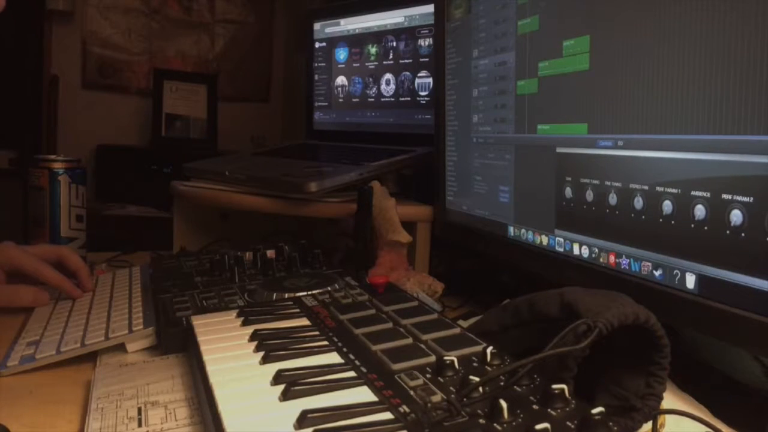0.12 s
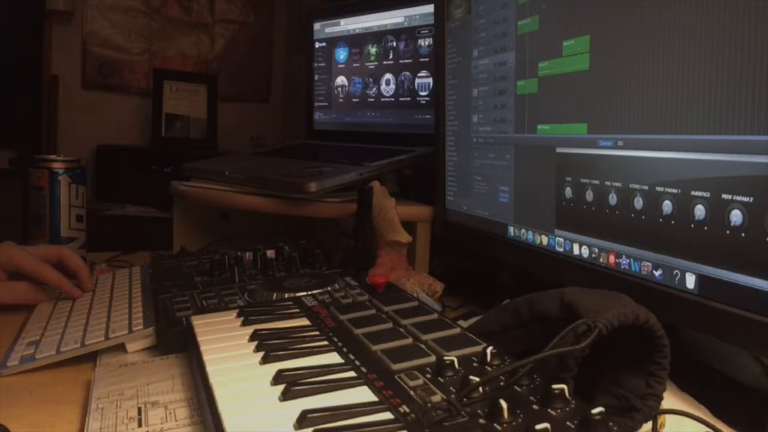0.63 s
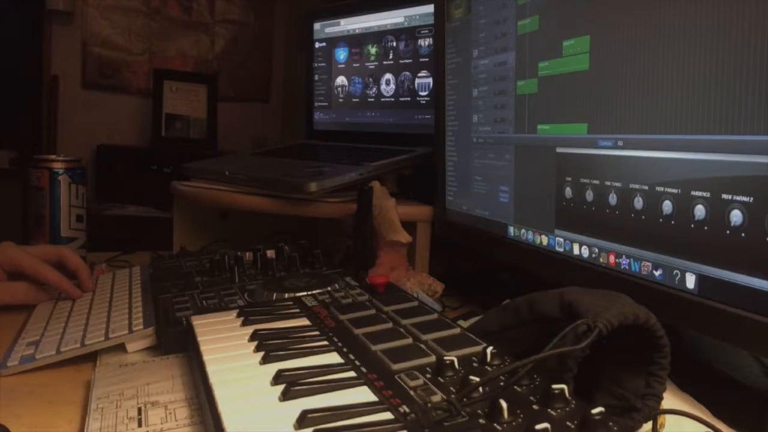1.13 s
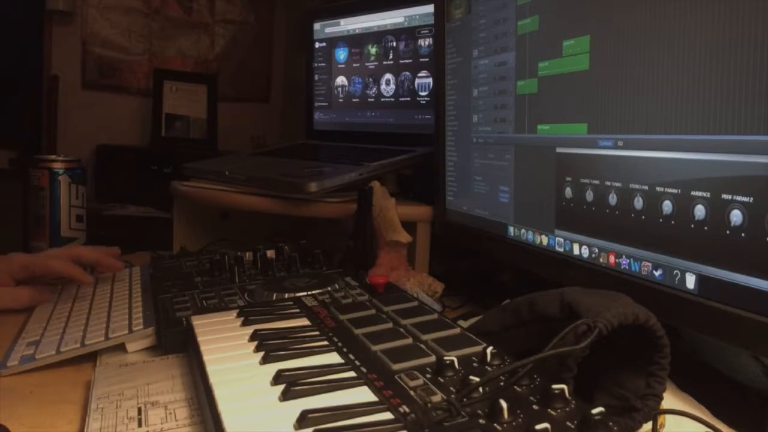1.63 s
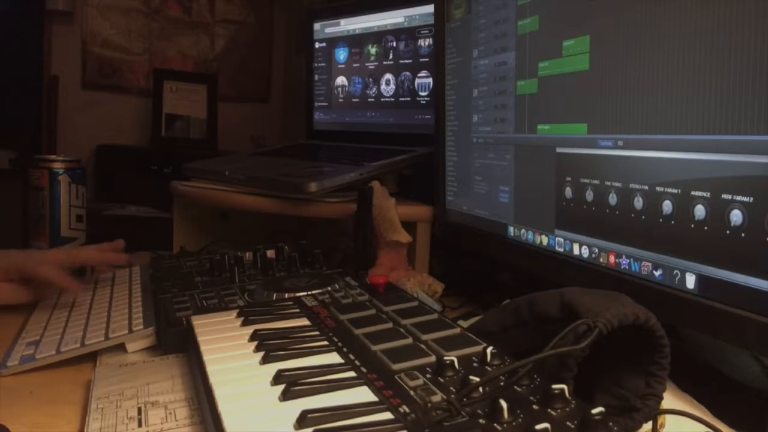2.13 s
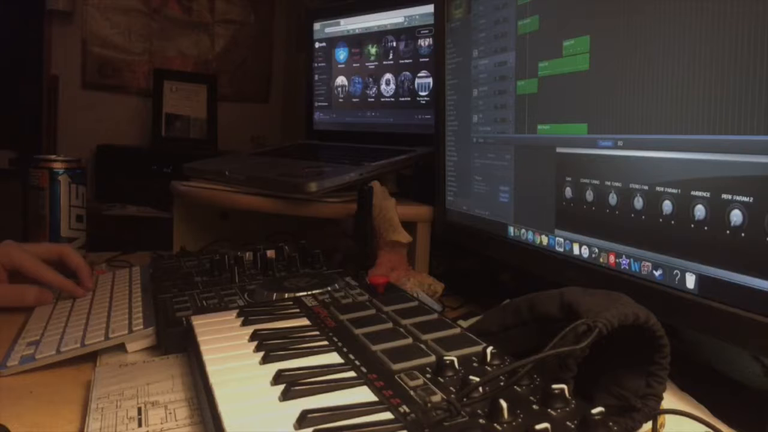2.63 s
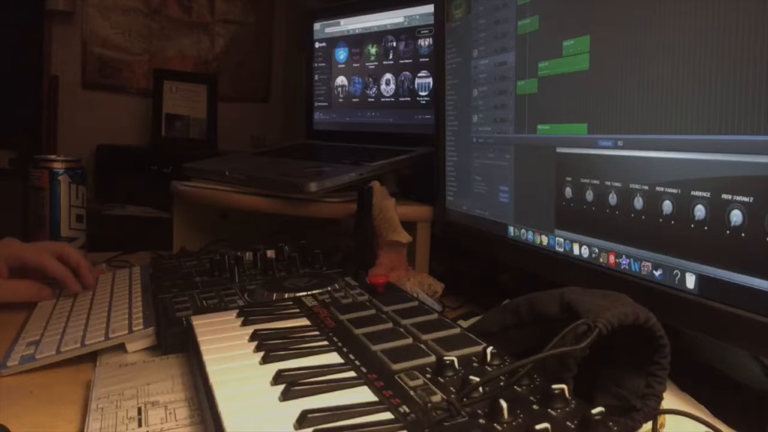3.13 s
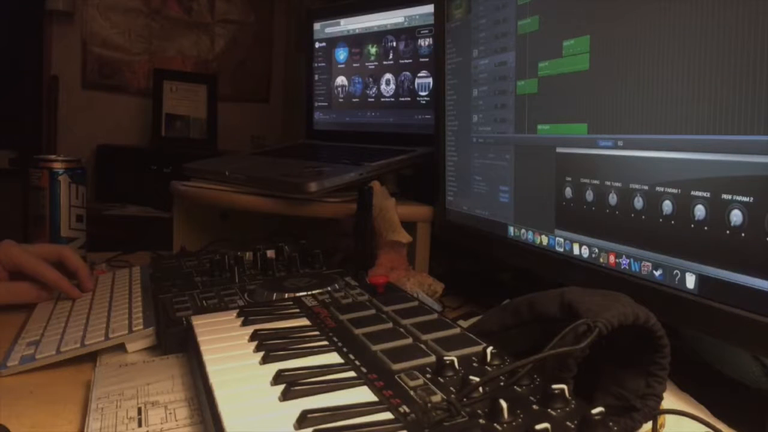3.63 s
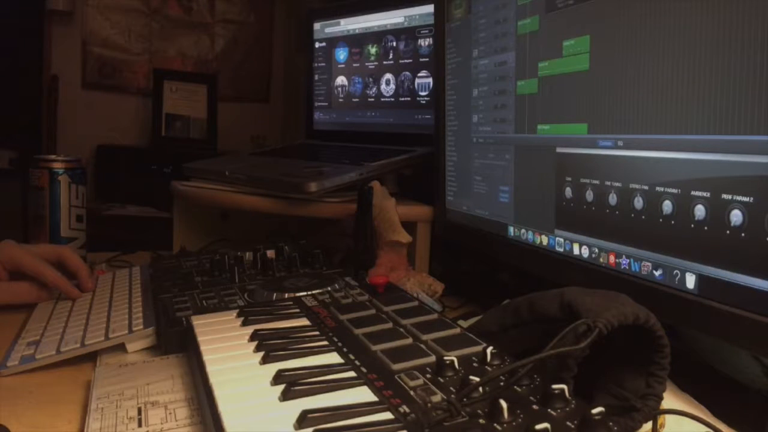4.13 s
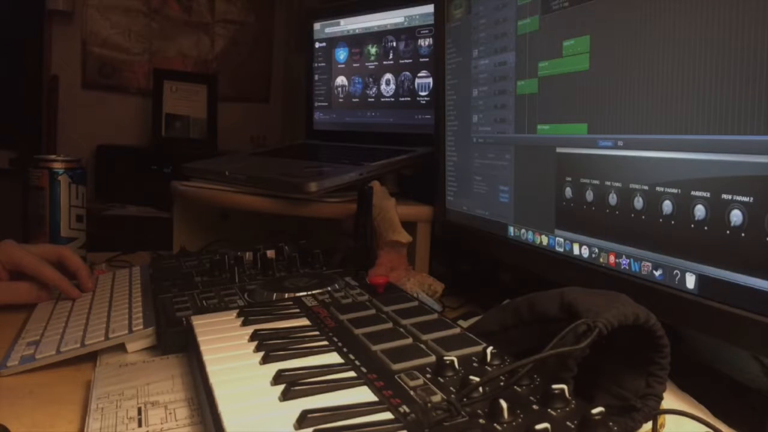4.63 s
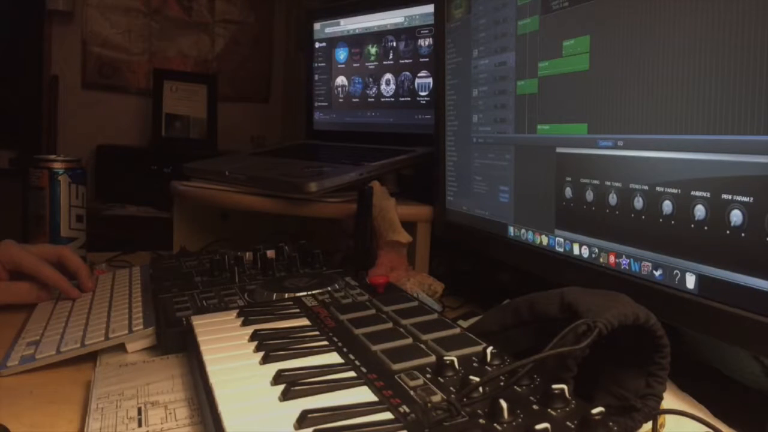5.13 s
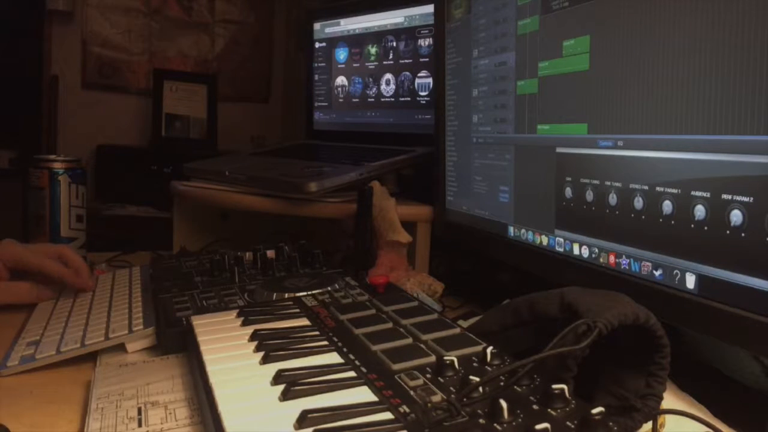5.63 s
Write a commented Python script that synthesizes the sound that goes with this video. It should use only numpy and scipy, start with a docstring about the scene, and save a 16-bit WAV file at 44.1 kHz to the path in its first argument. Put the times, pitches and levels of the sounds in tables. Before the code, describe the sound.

In a small furnished room, a constant low motor and mains hum lies under soft air hiss. A hand on a thin computer keyboard makes sparse, faint clicks: one early, a couple near one second, a crackly cluster around 1.6 seconds, then a long gap, another click just after three seconds and last ones near the end. Close, quiet mono pickup with little reverberation.

```python
"""A low steady hum fills a quiet home room: a motor turning, and the magnetic hum of its mains supply.
Air noise fills the low room modes and hisses above them; narrow bands and short swells are part of it.
A hand on a thin computer keyboard makes scattered faint clicks: rattles of tiny knocks ring the key parts.
Soft fingertip touches are dull puffs of noise, and fingers brushing the keys are dense grains."""
import sys
import numpy as np
from scipy import signal
from scipy.fft import rfft, irfft
from scipy.io import wavfile

SR = 44100
rng = np.random.default_rng(int(sys.argv[2]) if len(sys.argv) > 2 else 0)


def generate_wav(sig):
    """Save sig (samples, or channels by samples) to the path in sys.argv[1] as 16-bit PCM at SR."""
    pcm = np.round(np.clip(np.atleast_2d(sig).T, -1, 1) * 32767).astype(np.int16)
    wavfile.write(sys.argv[1], SR, pcm)


def convert_level_to_amplitude(level_db):
    """Map a level in decibels to its linear amplitude factor."""
    exponent = np.asarray(level_db, float) / 20
    return 10 ** exponent


N = 254016  # samples, 5.76 s


def rms_one(x):
    """Scale to rms 1."""
    return x / np.sqrt(np.mean(x ** 2) + 1e-20)


def drift(rate_hz):
    """Slow random curve of mean 0 and spread about 1: noise through two equal one-pole low-passes."""
    hop = 40  # samples between the points of the curve
    pole = np.exp(-2 * np.pi * rate_hz * hop / SR)
    noise = rng.standard_normal(N // hop + 4002)
    slow = signal.lfilter([1], [1, -2 * pole, pole * pole], noise)[4000:]
    return np.interp(np.arange(N) / hop, np.arange(len(slow)), rms_one(slow - slow.mean()))


def resonance(x, hz, width_hz):
    """One two-pole resonance with a gain of about 1 at its peak."""
    r = np.exp(-np.pi * width_hz / SR)
    feed = np.array([1, 0, -1]) * (1 - r * r) / 2
    return signal.lfilter(feed, [1, -2 * r * np.cos(2 * np.pi * hz / SR), r * r], x)


def resonance_twice(x, hz, width_hz):
    """Two equal resonances in a row: the skirts fall steeper, so the valleys stay dark."""
    return resonance(resonance(x, hz, width_hz), hz, width_hz)


def tone(hz, level_db, waver_db):
    """A sine of steady pitch whose level wavers a little."""
    phase = 2 * np.pi * (hz * np.arange(N) / SR + rng.random())
    return np.sqrt(2) * convert_level_to_amplitude(level_db + waver_db * drift(1.5)) * np.sin(phase)


def hum():
    """Multiples of the motor's rotation, magnetic hum at twice the mains rate, and their sum tones."""
    motor_hz, magnet_hz = 57.72, 119.92
    # motor turning: rotation_multiple, level_db (rms)
    motor_orders = [(1, -44), (2, -82), (3, -71), (4, -68), (5, -74.5), (12, -91.5), (13, -81)]
    # magnetic hum and its sums with the rotation: hum_multiple, rotation_multiple, level_db (rms)
    magnet_tones = [(1, 0, -44.5), (1, 1, -67), (1, 2, -79), (2, 0, -79.5), (2, 1, -73)]
    turning = sum(tone(k * motor_hz, db, waver_db=0.5) for k, db in motor_orders)
    magnetic = sum(tone(m * magnet_hz + k * motor_hz, db, waver_db=0.46) for m, k, db in magnet_tones)
    return turning + magnetic


def rumble():
    """Air noise heard through each low room mode, every mode wavering on its own."""
    waver_db = 2.5
    # low room modes: pitch_hz, width_hz (of both passes together), level_db (rms before the waver)
    room_modes = [(41.5, 8, -70.5), (62.3, 15, -61.5), (90, 21, -60.5), (120.8, 10.6, -55),
                  (136.7, 22.5, -54), (170.5, 18, -62), (212, 19.5, -63.5), (231, 5.8, -67.5),
                  (260.9, 14.7, -66), (290.8, 33, -66), (350, 54, -70), (403.5, 14.6, -75),
                  (485.3, 18, -81.5)]
    out = np.zeros(N)
    for hz, width_hz, db in room_modes:
        filled = resonance_twice(rng.standard_normal(N + SR), hz, width_hz * 1.5)
        settled = filled[SR:]  # the first second lets the filter fill up
        out += convert_level_to_amplitude(db + waver_db * drift(12.0)) * rms_one(settled)
    return out


def air():
    """Coloured air noise: bands come and go in the middle range, the top is a nearly steady hiss."""
    hiss_db = -68.5  # rms of the whole
    # colour of the hiss: pitch_hz, density_db (relative, per Hz)
    hiss_colour = [(450, -0.5), (600, -2.5), (750, -2.5), (1000, -4), (1400, -3), (1800, -4), (2050, -6.5),
                   (2320, -10), (3000, -14), (3800, -15), (4800, -18), (8000, -22), (13000, -25),
                   (15000, -28.5), (16000, -36)]
    hz = np.fft.rfftfreq(N, 1 / SR) + 1
    points = np.array(hiss_colour)
    colour = convert_level_to_amplitude(np.interp(np.log(hz), np.log(points[:, 0]), points[:, 1]))
    low_cut = 1 / (1 + (400 / hz) ** 4)
    spectrum = rfft(rng.standard_normal(N)) * colour * low_cut
    step = 10 * np.log2(np.clip(hz, 500, 4000) / 500)  # tenths of an octave
    together, out = drift(15.0), np.zeros(N)
    for centre in range(31):
        share = np.clip(1 - abs(step - centre), 0, 1)  # neighbouring shares add to one
        unrest = np.clip((30 - centre) / 10, .1, 1)  # calms down above 2 kHz
        waver_db = unrest * (.6 * together + 2.3 * drift(7.0))
        out += irfft(spectrum * share, N) * convert_level_to_amplitude(waver_db)
    return convert_level_to_amplitude(hiss_db) * rms_one(out)


def air_bands():
    """Narrow bands of noise that stand out of the air noise, each swelling and fading on its own."""
    waver_db = 3.0
    # bands: pitch_hz, width_hz (of each of two passes), level_db (rms before the waver)
    narrow_bands = [(900, 80, -85), (1090, 80, -85), (1389, 100, -85), (1564, 50, -87), (1768, 60, -86),
                    (1905, 25, -89), (2131, 120, -88), (2778, 130, -91), (3058, 110, -93)]
    out = np.zeros(N)
    for hz, width_hz, db in narrow_bands:
        band = resonance_twice(rng.standard_normal(N), hz, width_hz)
        out += convert_level_to_amplitude(db + waver_db * drift(6.0)) * rms_one(band)
    return out


def noise_swells():
    """Short narrow-band swells of noise at random moments and pitches, part of the noise floor."""
    swells_per_s, swells_db = 110, -77  # over all pitches; rms of the whole
    tilt_db, width_share = -9, .016  # from lowest to highest pitch; width of each pass over pitch
    hop = 40  # samples between possible starts
    pitches_hz, out = np.geomspace(700, 3200, 48), np.zeros(N)
    swell = np.hanning(SR // 25)[::hop]  # 40 ms
    for k, hz in enumerate(pitches_hz):
        steps = N // hop + 1
        starts = rng.random(steps) < hop * swells_per_s / len(pitches_hz) / SR
        strength = convert_level_to_amplitude(3 * rng.exponential(1, steps).clip(0, 2.5))
        envelope = np.convolve(starts * strength, swell)[:steps]
        swelling = np.repeat(envelope, hop)[:N] * rng.standard_normal(N)
        width_hz = width_share * hz
        band = resonance_twice(swelling + 1e-18, hz, width_hz) / np.sqrt(width_hz)
        out += convert_level_to_amplitude(tilt_db * k / len(pitches_hz)) * band
    return convert_level_to_amplitude(swells_db) * rms_one(out)


def brush():
    """Skin on plastic: dense grains through a broad resonance; each stroke swells and fades."""
    edge_db = -11  # one rise before and one fall after the loudest moment
    # strokes: loudest_s, rise_s, fall_s, level_db (rms at the loudest moment), centre_hz
    strokes = [(.52, 0.14, 0.072, -76.5, 5400), (1.24, .04, .03, -83, 9000),
               (1.588, 0.018, 0.011, -71, 11000), (1.63, 0.059, 0.043, -78, 3670),
               (1.695, 0.023, 0.053, -73, 6840), (.93, .012, 0.062, -77, 6200),
               (3.158, 0.014, 0.056, -72.5, 5850), (3.34, .04, 0.071, -76, 4800),
               (5.355, 0.013, .01, -79, 4970), (5.375, 0.03, .05, -76.5, 5000),
               (5.74, 0.031, 0.012, -70, 10000)]
    out, t = np.zeros(N), np.arange(N) / SR
    present = rng.random(N) < 15000 / SR  # grains per second
    grains = convert_level_to_amplitude(3.0 * rng.exponential(1, N)) * rng.choice([-1, 1], N) * present
    bright = signal.sosfilt(signal.butter(2, 2500, "high", fs=SR, output="sos"), grains)
    for loudest_s, rise_s, fall_s, db, hz in strokes:
        rub = rms_one(resonance(bright, hz, 0.42 * hz) + 0.23 * bright)
        away = np.maximum((loudest_s - t) / rise_s, (t - loudest_s) / fall_s)
        out += convert_level_to_amplitude(db + edge_db * np.minimum(away, 6) ** 2.0) * rub
    return out


def thumps():
    """Soft fingertip touches: a puff of noise through one dull resonance."""
    # touches: start_s, level_db (peak), pitch_hz, rise_s (until the puff is loudest)
    touches = [(0.44, -58.5, 1010, 0.011), (0.501, -56, 1320, 0.016), (0.655, -64, 1350, 0.007),
               (1.619, -55, 950, 0.006), (1.64, -58, 420, .01), (1.684, -57, 900, 0.005),
               (3.176, -60, 1410, 0.008), (2.755, -63.5, 2830, 0.013), (3.339, -57.5, 1480, 0.016),
               (3.532, -63, 1410, 0.0066), (4.24, -59, 1340, 0.0061)]
    out, span = np.zeros(N + SR), 4400
    t = np.arange(span) / SR
    for start_s, db, hz, rise_s in touches:
        puff = rng.standard_normal(span) * t / rise_s * np.exp(1 - t / rise_s)
        rung = resonance_twice(puff, hz, 350)
        at = round(start_s * SR)
        out[at:at + span] += convert_level_to_amplitude(db) * rung / abs(rung).max()
    return out[:N]


def key_knocks(t):
    """A rattle of tiny knocks, a few ms long, with a faint tail, scattered early reflections from the desk."""
    scatter_db, scatter_s = -22, .004
    rattle = np.exp(-((t - .0005) / 0.0012) ** 2)
    scatter = convert_level_to_amplitude(scatter_db) * np.exp(-t / scatter_s)
    sparse = rng.standard_normal(len(t)) * (rng.random(len(t)) < .25)
    knocks = sparse * (rattle + scatter)
    knocks[0] = 2.2  # the first contact
    return knocks


def keys():
    """The knocks of each contact strike the modes of every part; a broad snap fills the gaps."""
    favour_db_per_octave, snap_db = 62, -11
    case_lag_s = 0.00078  # the case answers a moment after the cap
    # contacts: start_s, plate_hz and cap_hz (pitches favoured there), then the peak of each ringing
    # part before its snap: case_db, plate_db, cap_db, hinge_db, stem_db, tick_db, edge_db
    contacts = [(0.3344, 3060, 4770, -64, -49.5, -42, -54, -51, -46.5, -49),
                (0.338, 2680, 4700, -50.5, -48, -65, -55, -58, -65, -66),
                (0.9155, 3250, 4650, -80, -53, -52.5, -50, -53, -62, -51),
                (0.92, 3200, 4400, -84, -68, -64, -60, -66, -75, -66),
                (0.958, 3200, 5200, -84, -67, -64, -62, -65, -74, -66),
                (1.157, 3200, 4700, -77, -74, -77, -69, -58, -57.5, -62),
                (1.578, 3200, 5200, -71, -61, -70, -64, -60, -69, -65),
                (1.584, 2750, 4400, -69, -62, -63, -66, -61, -70, -62),
                (1.591, 3200, 4400, -75, -72, -70, -70, -70, -75, -70),
                (1.615, 3200, 5200, -64, -64, -72, -69, -76, -80, -78),
                (1.6803, 2400, 3830, -76, -69, -66, -75, -54.5, -66, -58),
                (1.684, 2400, 3830, -80, -65, -56, -74, -62, -74, -68),
                (1.717, 3200, 4900, -70, -80, -69, -71, -62, -84, -78),
                (1.7328, 3200, 4700, -78, -80, -80, -74, -67, -76, -72),
                (3.1646, 2730, 4360, -62, -54.5, -51.5, -55, -52.5, -64, -56),
                (3.1692, 2660, 4900, -53.5, -52.5, -64, -66, -60, -66, -57),
                (3.767, 3200, 4700, -80, -64, -71, -69, -72, -81, -76),
                (5.3604, 3200, 4900, -80, -52, -45, -54, -57, -56, -52),
                (5.712, 3200, 4700, -61, -80, -80, -72, -60, -72, -64),
                (5.7295, 3200, 5200, -75, -80, -76, -59.5, -52.5, -61, -51),
                (5.735, 3200, 5200, -77, -80, -76, -64, -66, -68, -64)]
    # modes of key and case before small chances: pitch_hz, level_db (relative peak),
    # ring_s (nominal; each pass is 5.2 / ring_s Hz wide)
    ring_modes = [(1385, 0, 0.027), (2400, -3, 0.014), (2740, 0, 0.017), (3160, 0, 0.015),
                  (3850, -4, 0.012), (4350, -1, 0.014), (4690, 0, 0.015), (5200, -1, 0.012),
                  (5800, 0, 0.012), (6450, -2, 0.012), (7200, 0, 0.011), (8000, -6, 0.01),
                  (8750, -1, 0.011), (9400, 0, 0.011), (9850, -4, 0.01), (11250, -1, 0.009),
                  (12200, 0, 0.008), (13300, -6, 0.008), (14400, 0, 0.007), (15100, -6, 0.007)]
    # upper limit of each part's range but the last: top_hz
    part_tops_hz = [2000, 3700, 5550, 6850, 9050, 10500]
    out, span = np.zeros(N + SR), 2600
    t = np.arange(span) / SR
    edges_hz = [1100, *part_tops_hz, 15500]
    for start_s, plate_hz, cap_hz, *parts_db in contacts:
        knocks = key_knocks(t)
        parts = np.zeros((len(parts_db), span))
        for k, (hz, db, ring_s) in enumerate(ring_modes):
            level_chance, pitch_chance = rng.standard_normal(2)
            part = np.searchsorted(part_tops_hz, hz)
            if part in (1, 2):  # plate and cap
                favoured_hz = (plate_hz, cap_hz)[part - 1]
                db = db - favour_db_per_octave * abs(np.log2(hz / favoured_hz))
            rung = resonance_twice(knocks, hz * (1 + .007 * pitch_chance), 5.2 / ring_s)
            sign = (-1) ** k
            parts[part] += sign * convert_level_to_amplitude(db + 1.3 * level_chance) * rung / abs(rung).max()
        parts[0] = np.roll(parts[0], round(case_lag_s * SR))
        parts = parts / abs(parts).max(axis=1, keepdims=True)
        for part, band_hz in enumerate(zip(edges_hz, edges_hz[1:])):
            snap = signal.sosfilt(signal.butter(2, band_hz, "band", fs=SR, output="sos"), knocks)
            parts[part] += convert_level_to_amplitude(snap_db) * snap / abs(snap).max()
        at = round(start_s * SR)
        out[at:at + span] += convert_level_to_amplitude(np.array(parts_db)) @ parts
    return out[:N]


def room(x):
    """A small furnished room: a dense tail of dying noise, duller than the source."""
    t60_s, room_db = .14, -22  # room_db: energy of the tail
    t = np.arange(SR // 2) / SR
    tail = rng.standard_normal(len(t)) * convert_level_to_amplitude(-60 * t / t60_s) * (t > .003)
    tail = signal.lfilter([1], [1, -.6], tail)
    tail = tail / np.sqrt(np.sum(tail ** 2))
    return convert_level_to_amplitude(room_db) * signal.fftconvolve(x, tail)[:N]


def scene():
    """Hand sounds with their room, over hum, rumble, hiss, narrow bands and short swells of noise."""
    background = hum() + rumble() + air() + air_bands() + noise_swells()
    hand = brush() + thumps() + keys()
    return (background + hand + room(hand))[None]


def top_cut(x):
    """Nothing passes above the cut-off."""
    return signal.sosfilt(signal.butter(12, 15870, fs=SR, output="sos"), x)


def record(dry):
    """A narrow dip in the treble, then a roll-off at the very top."""
    dipped = dry - .5 * resonance(dry, 10430, 560)
    rolled = signal.sosfilt(signal.butter(4, 15500, fs=SR, output="sos"), dipped)
    return top_cut(rolled)


dry = scene()
out = record(dry)
generate_wav(out)
```